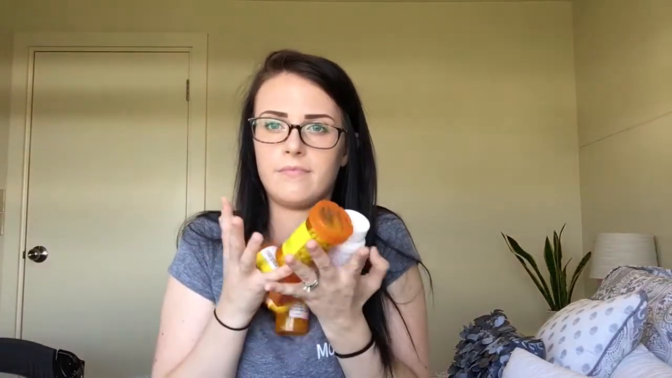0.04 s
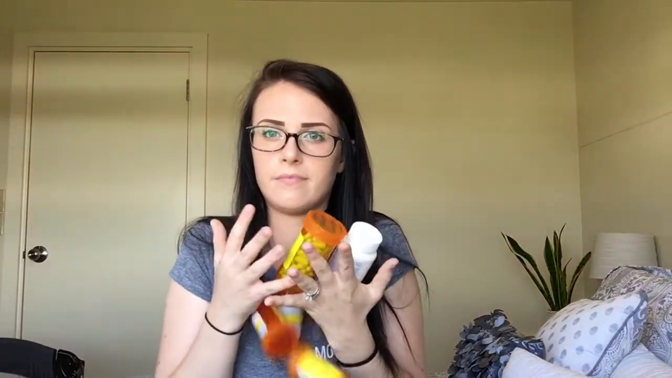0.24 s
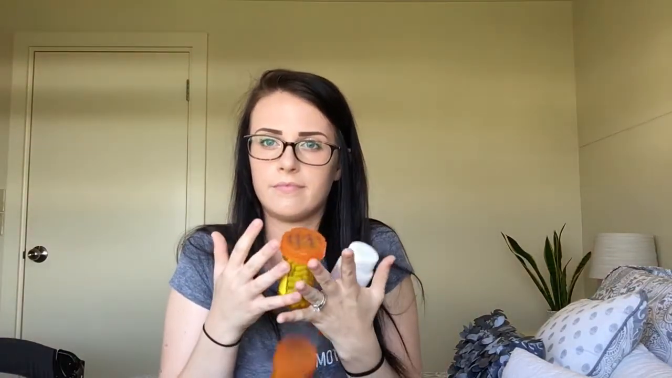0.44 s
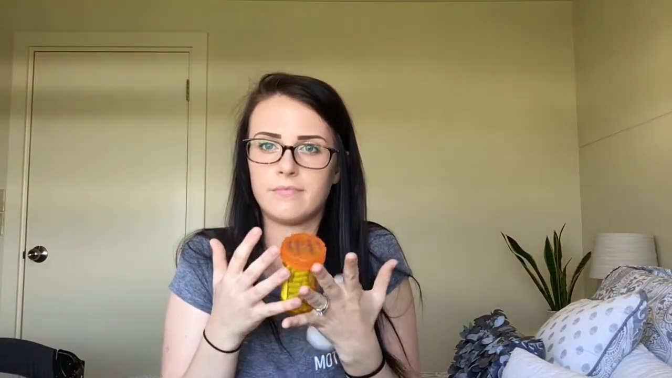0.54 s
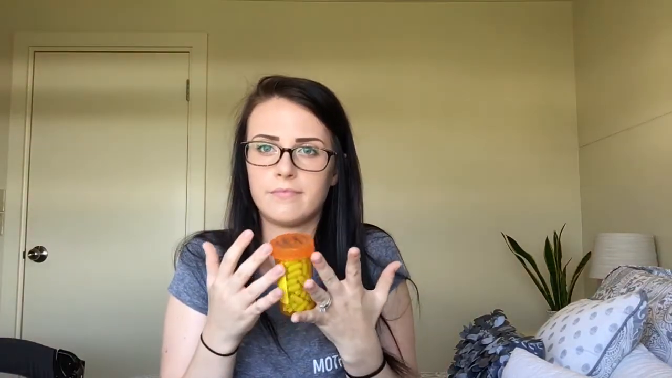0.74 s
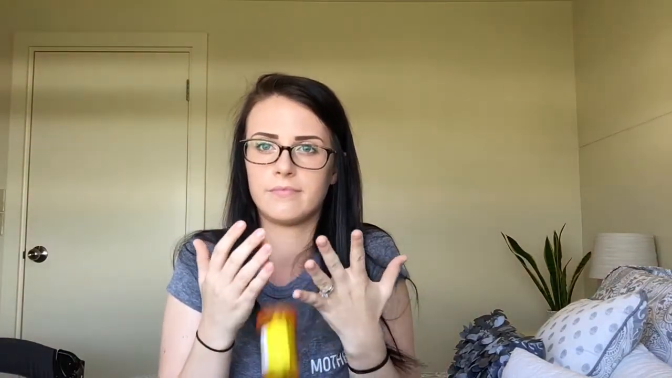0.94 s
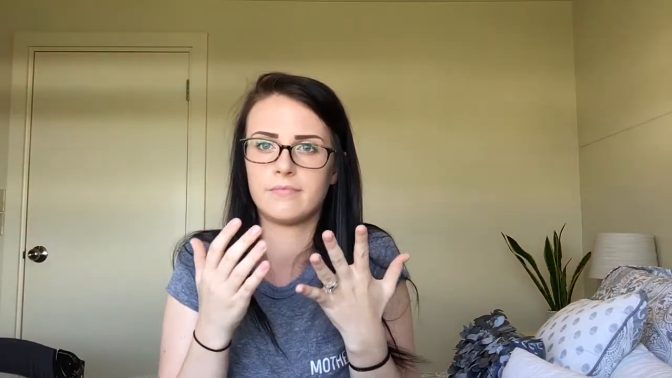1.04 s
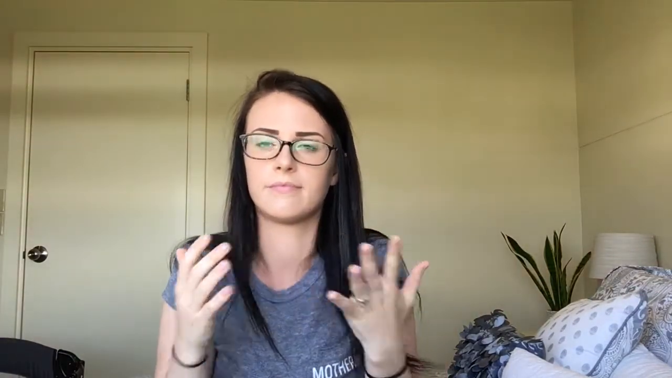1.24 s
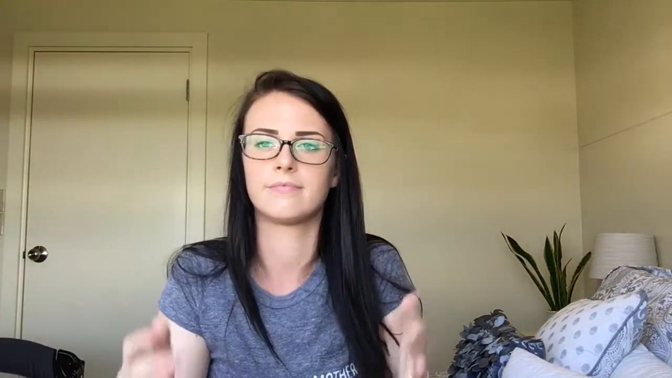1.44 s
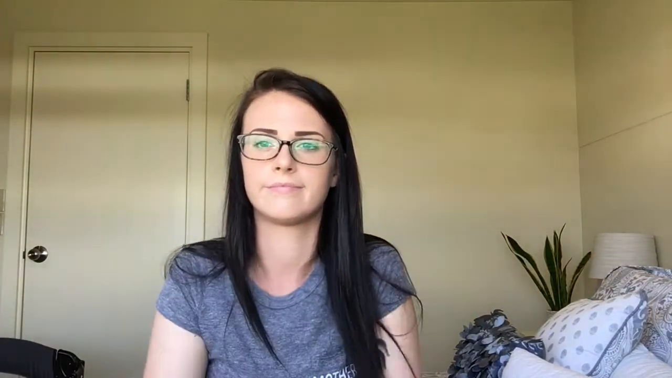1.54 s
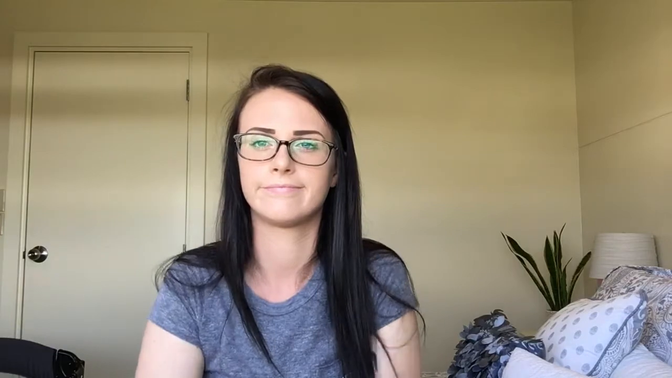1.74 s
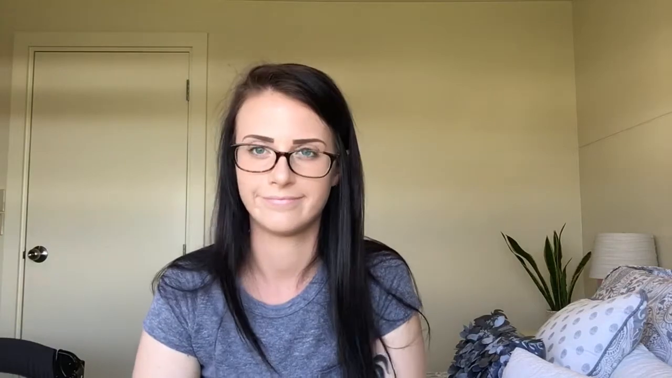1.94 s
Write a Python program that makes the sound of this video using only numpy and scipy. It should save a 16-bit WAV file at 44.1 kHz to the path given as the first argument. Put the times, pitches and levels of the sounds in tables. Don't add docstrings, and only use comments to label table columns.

```python
import sys
import numpy as np
from scipy import signal
from scipy.io import wavfile

SR = 44100
rng = np.random.default_rng(int(sys.argv[2]) if len(sys.argv) > 2 else 0)


def magnitude_from_level(level_db):
    exponent = np.asarray(level_db, float) / 20
    return 10 ** exponent


def materialize(psi):
    bounded = np.clip(np.atleast_2d(psi).T, -1, 1)
    quanta = np.round(bounded * 32767).astype(np.int16)
    wavfile.write(sys.argv[1], SR, quanta)


N = 88200


def evened(x):
    return x / np.sqrt(np.mean(x ** 2) + 1e-20)


def read(points, hz):
    f, value = np.transpose(points)
    return np.interp(np.log(hz + 1), np.log(f + 1), value)


def colour(x, points):
    gain_db = read(points, abs(np.fft.fftfreq(4096, 1 / SR)))
    log_gain = np.log(magnitude_from_level(np.maximum(gain_db, -100)))
    taps = np.fft.ifft(np.exp(np.conj(signal.hilbert(log_gain)))).real[:2048]
    return signal.oaconvolve(x, taps)[:len(x)]


def resonate(x, hz, width):
    r = np.exp(-np.pi * width / SR)
    return signal.lfilter([1, 0, -1], [1, -2 * r * np.cos(2 * np.pi * hz / SR), r * r], x)


def add(mix, s, sound):
    part = mix[round(s * SR):][:len(sound)]
    part += sound[:len(part)]


def air():
    # (frequency [Hz], density [dB per Hz])
    tone = [(12, -58), (20, -15.5), (49, -13.5), (147, -8), (206, -8), (492, -13), (616, -12.5), (900, -16),
            (2000, -29), (16500, -43)]
    # (frequency [Hz], width [Hz], level [dB])
    hum_bands = [(58, 12, -61.5), (111.9, 3.6, -64)]
    noise = rng.standard_normal(N)
    hum = sum(magnitude_from_level(db) * evened(resonate(rng.standard_normal(N), hz, width)) for hz, width, db in hum_bands)
    return magnitude_from_level(-53.5) * evened(colour(noise, tone)) + hum


def room(x):
    # (frequency [Hz], t60 [s])
    decay = [(200, 0.22), (1000, 0.3), (4000, 0.45), (14000, 0.22)]
    taps = np.zeros(SR // 2)
    at = np.arange(120, SR // 2 - 20, 20)
    taps[at + rng.integers(0, 20, len(at))] = rng.choice([-1., 1.], len(at))
    hz, t, z = signal.stft(taps, SR, nperseg=256)
    fade = magnitude_from_level(-60 * t / read(decay, hz)[:, None])
    tail = signal.istft(z * fade, SR, nperseg=256)[1]
    return signal.fftconvolve(x, tail / np.linalg.norm(tail))[:N]


def thumps():
    # (time [s], level [dB], pitch [Hz], t60 [s], knock over push [dB])
    landings = [(0.01, -50.5, 301.6, 0.57, 10), (0.23, -23, 58, 0.13, -6), (.25, -36, 104, 0.093, -15),
                (.452, -29, 332, 0.072, -6), (0.502, -43.5, 53.5, 0.42, -4), (0.681, -37.5, 62, 0.31, 4.5),
                (0.915, -41.5, 53, .2, -10), (1.163, -43.5, 58, 0.48, -2.5), (1.688, -44.5, 196, 0.55, 5.5),
                (1.702, -26.5, 111.3, 0.15, -2.5), (1.73, -32, 54, 0.29, -5)]
    rise_s, knock_t60_s = 0.011, 0.44
    out, t = np.zeros(N), np.arange(SR // 4) / SR
    puffs = rng.standard_normal((len(landings), len(t)))
    for (s, db, hz, t60, knock_db), puff in zip(landings, puffs):
        push = np.sin(2 * np.pi * hz * t)
        knock = evened(resonate(resonate(puff, 260, 220), 280, 270))
        knock *= magnitude_from_level(knock_db - 60 * t / knock_t60_s)
        add(out, s, magnitude_from_level(db - 60 * t / t60) * np.minimum(t / rise_s, 1) * (push + knock))
    return out


def pill_hits(per_s, spread_db, cycles, plain, size):
    force = magnitude_from_level(spread_db * np.minimum(rng.exponential(1, size), 3))
    force *= rng.random(size) < per_s / SR
    force *= rng.choice([-1., 1.], size)
    spot = rng.integers(0, 24, size)
    rings = 0
    for k, hz in enumerate(np.geomspace(500, 13000, 24)):
        rings = rings + np.sqrt(hz) * evened(resonate(force * (spot == k), hz, hz / cycles))
    return evened(force), evened(evened(rings) + plain * evened(force))


def tumble():
    # (time [s], level [dB])
    strength = [(0, -28.5), (.07, -34.5), (.2, -31.5), (.4, -36.5), (.58, -39), (.8, -33), (.9, -34.5),
                (1.05, -36), (1.12, -53), (1.22, -27), (1.349, -35), (1.42, -44.5), (1.601, -72),
                (1.76, -51), (1.85, -65), (1.95, -50), (2, -95)]
    # (frequency [Hz], density [dB per Hz])
    roll = [(88, -47.5), (150, -22.5), (222, -7), (1090, -5), (1500, 0.5), (2050, -2.5), (3930, -5.5),
            (15000, -32.5), (16500, -39)]
    # (frequency [Hz], width [Hz], level [dB], start [s], end [s])
    wall_rings = [
        (1560, 110, -6, 0.28, 0.44),
        (2400, 200, -7, 0.08, 0.22),
        (1450, 160, -9, 0.96, 1.06),
        (4200, 700, -9, 0.68, 1.2),
        (2350, 200, -8, 0.74, 0.85),
    ]
    force, hits = pill_hits(per_s=1800, spread_db=1.5, cycles=6.0, plain=.6, size=N)
    t, walls = np.arange(N) / SR, np.zeros(N)
    for hz, width, db, start, end in wall_rings:
        gate = np.clip(np.minimum(t - start, end - t) / 0.016 + .5, 0, 1)
        walls += magnitude_from_level(db) * evened(resonate(force, hz, width)) * gate
    return magnitude_from_level(np.interp(t, *np.transpose(strength))) * (evened(colour(hits, roll)) + walls)


def clicks():
    # (time [s], peak [dB], centre [Hz])
    click_events = [(0.01, -30, 5000), (.0384, -36, 9200), (.0634, -40, 7960), (.1008, -23, 5100),
                    (0.104, -30.5, 9000), (.1414, -36, 8000), (0.172, -36, 8500), (0.2298, -26, 12000),
                    (0.2402, -8, 9000), (0.2436, -12, 4000), (0.268, -27, 3600), (0.3, -27, 7000),
                    (0.3213, -17, 9000), (.334, -16.5, 8000), (0.3375, -25, 9000), (.3483, -25, 7000),
                    (0.361, -28.5, 6500), (.41, -24.5, 4500), (0.4297, -27, 4500), (.4344, -42, 11000),
                    (.473, -41, 7930), (.496, -33, 5250), (0.5094, -6, 4280), (0.5222, -18, 3010),
                    (.6067, -21.5, 5440), (0.614, -19, 3690), (0.6882, -20.5, 3840), (0.6917, -22.5, 6000),
                    (0.7095, -21, 6000), (0.735, -27.5, 6000), (.7484, -30, 5000), (.7544, -30, 7050),
                    (0.7662, -25, 7500), (0.79, -26, 4240), (0.803, -31, 8970), (0.858, -28, 6000),
                    (0.8933, -26, 6000), (1.091, -23, 4200), (1.2896, -23, 3800), (1.309, -31, 5040),
                    (1.3214, -31.5, 5070), (1.3318, -30.5, 4990), (1.737, -30, 7000), (1.768, -29, 6500),
                    (1.796, -34, 6500), (1.856, -52, 6500)]
    level_db, decay_s, relative_width = -2, 0.0019, 0.33
    out, t = np.zeros(N), np.arange(600) / SR
    bursts = rng.standard_normal((len(click_events), len(t)))
    for (s, db, hz), burst in zip(click_events, bursts):
        burst = evened(resonate(burst, hz, hz * relative_width))
        add(out, s, magnitude_from_level(db + level_db) * burst * np.exp(-t / decay_s))
    return out


def ticks():
    # (time [s], peak [dB], pitch [Hz], ring [cycles])
    tick_events = [(0.0825, -20.5, 2380, 9.7), (0.107, -10.5, 1930, 1.7), (.148, -17.5, 2380, 4),
                   (0.17, -14.5, 5430, 5), (.185, -16, 3470, 4), (0.2038, -13.5, 3800, 5.4),
                   (0.209, -15.5, 2390, 5), (.226, -23, 4170, 2), (0.325, -10, 1530, 4),
                   (.378, -24, 2470, 3), (.391, -16.5, 5400, 3.5), (0.4571, -20.5, 1500, 3.9),
                   (0.48, -18, 2030, 2), (0.579, -18, 2300, 2), (0.588, -17.5, 2330, 2),
                   (0.633, -15, 2544, 3), (.681, -9.5, 1380, 1.5), (.828, -19, 6500, 3),
                   (.849, -14, 3000, 2), (0.873, -15, 6000, 2), (1.033, -22, 1500, 6),
                   (1.068, -18, 3795, 8), (1.097, -11, 4270, 3), (1.44, -28, 2240, 4),
                   (1.471, -24, 2400, 2), (1.503, -33.5, 2535, 2), (1.753, -17.5, 1453, 4),
                   (1.912, -20, 2650, 1.26), (1.92, -30.5, 2300, 3), (1.933, -33.5, 2100, 1.5)]
    # (time [s], peak [dB], pitch [Hz], ring [cycles])
    knock_events = [(.021, -21, 700, 1.8), (.1605, -18.5, 760, 2.2), (.332, -15, 1530, 6),
                    (.508, -22, 900, 5), (.699, -15, 1400, 30), (.6995, -18, 1110, 22), (.7, -21, 738, 14),
                    (.704, -16, 1270, 24), (.705, -26, 2220, 25), (.718, -18, 1400, 20),
                    (.751, -22, 1070, 14), (.768, -25, 1250, 10), (.916, -7, 1950, 8), (.92, -20, 877, 8),
                    (.968, -13, 1420, 6), (.975, -11, 1480, 9), (.985, -16, 1400, 5), (1.077, -23, 1150, 5),
                    (1.078, -25, 2300, 6), (1.084, -25, 1100, 5), (1.17, -11, 2100, 8),
                    (1.445, -34, 3200, 5), (1.757, -26, 2600, 8)]
    overtone, overtone_db, snap_db = 1.6, -9, -7
    strikes = tick_events + knock_events
    out, t = np.zeros(N), np.arange(5000) / SR
    snaps = rng.standard_normal((len(strikes), len(t)))
    for (s, db, hz, cycles), snap in zip(strikes, snaps):
        ring = np.sin(2 * np.pi * hz * t)
        ring += magnitude_from_level(overtone_db) * np.sin(2 * np.pi * overtone * hz * t)
        ring *= np.exp(-t * hz / cycles) * np.minimum(t / .00015, 1)
        snap = evened(resonate(resonate(snap, 3000, 5000), 6000, 12000)) * np.exp(-t / .001)
        add(out, s, magnitude_from_level(db) * (ring + magnitude_from_level(snap_db - cycles) * snap))
    return signal.sosfilt(signal.butter(2, 400, "high", fs=SR, output="sos"), out)


def jolts():
    # (time [s], level [dB], length [s], bottle ring [Hz], ring over clatter [dB])
    throws = [(.002, -34.5, 0.035, 1570, -7), (0.139, -32, 0.036, 620, 1), (0.23, -25, 0.0032, 2800, -4),
              (0.236, -26, .008, 2800, -10), (0.327, -28, 0.0046, 1630, -3), (0.343, -48.5, 0.005, 1550, 6),
              (0.451, -27.5, 0.0044, 1030, 0), (.47, -36, 0.044, 1500, 2.5), (0.502, -25, .004, 1800, 5.5),
              (0.506, -17.5, 0.0037, 2000, -6), (0.607, -26, 0.026, 2680, -0.5),
              (0.685, -20, 0.021, 2290, -4.5), (0.695, -15.5, 0.027, 1317, 12),
              (0.745, -30, 0.012, 1150, 12.5), (0.853, -28, 0.023, 1520, -9),
              (.916, -13, 0.0032, 1900, -7.5), (0.923, -11.5, 0.0089, 2700, -12),
              (0.966, -19, 0.014, 1500, -7.5), (1.071, -30.5, 0.047, 1140, 20),
              (1.1258, -13.5, 0.014, 1040, -10.5), (1.139, -12, 0.028, 1570, 0),
              (1.169, -13, 0.0062, 1934, 4.5), (1.187, -22.5, 0.0065, 1700, 3),
              (1.466, -42.5, 0.011, 2130, 6), (1.288, -29, 0.032, 3000, -1), (1.693, -52.5, .006, 1900, 6),
              (1.733, -33.5, 0.035, 6000, -5.5), (1.745, -34, 0.026, 1715, 15),
              (1.818, -39.5, 0.013, 1430, -3.5)]
    # (frequency [Hz], density [dB per Hz])
    clatter = [(88, -70), (150, -14.5), (1360, -6.5), (3490, -8), (4300, 2), (4870, -2.5), (13000, -22),
               (15600, -26), (16500, -61)]
    # (ratio to ring pitch [-], level [dB])
    modes = [
        (0.552, -11.5),
        (0.818, 0),
        (0.919, -4),
        (1.022, 2.5),
        (1.651, -9),
    ]
    rise_s, settle_t60_s, relative_width = .0015, .1, .085
    force, hits = pill_hits(per_s=4000, spread_db=2.5, cycles=4.6, plain=0.27, size=N)
    hits = evened(colour(hits, clatter))
    out, t = np.zeros(N), np.arange(SR // 6) / SR
    for s, db, length, hz, ring_db in throws:
        at = slice(round(s * SR), round(s * SR) + len(t))
        shape = np.minimum(t / rise_s, 1) * magnitude_from_level(-60 * np.maximum(t - length, 0) / settle_t60_s)
        push = force[at] * shape
        ring = sum(magnitude_from_level(d) * evened(resonate(push, hz * k, hz * k * relative_width)) for k, d in modes)
        ring = evened(ring) * np.sqrt(np.mean(shape ** 2))
        both = shape * hits[at] + magnitude_from_level(ring_db) * ring
        add(out, s, magnitude_from_level(db) * both / np.hypot(1, magnitude_from_level(ring_db)))
    return out


def facing(x):
    # (time [s], treble [dB])
    turning = [(0, -8), (.09, -5), (.24, 5.5), (.42, 6), (.5, 4), (.7, -4), (0.88, 1.5), (1.15, 0),
               (1.4, -19.5), (1.7, -10.5), (1.735, 0.5), (1.8, 1.5), (1.879, -18), (2, -5)]
    dull = signal.sosfilt(signal.butter(1, 4750, fs=SR, output="sos"), x)
    return dull + magnitude_from_level(np.interp(np.arange(N) / SR, *np.transpose(turning))) * (x - dull)


def scene():
    bottles = facing(jolts() + tumble() + ticks()) + clicks()
    reflections = magnitude_from_level(-11) * room(bottles)
    return (bottles + reflections + thumps() + air())[None]


def low_pass(x):
    return signal.sosfilt(signal.butter(12, 16850, fs=SR, output="sos"), x)


def record(dry):
    # (frequency [Hz], gain [dB])
    mic = [(3600, 0.5), (4600, -6), (5000, -6.5), (5600, -3), (9600, -2.5), (10500, -5.5), (11300, -1)]
    wet = np.tanh(colour(dry[0], mic) / 1.31) * 1.186
    edged = signal.oaconvolve(wet, signal.firwin(255, 15900, fs=SR), "same")
    edged += magnitude_from_level(-26) * (wet - edged)
    return low_pass(edged[None])


dry = scene()
out = record(dry)
materialize(out)
```